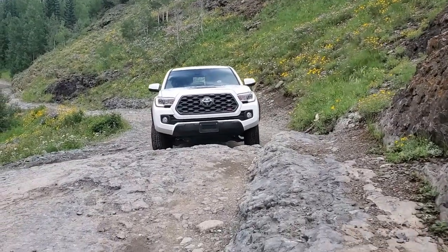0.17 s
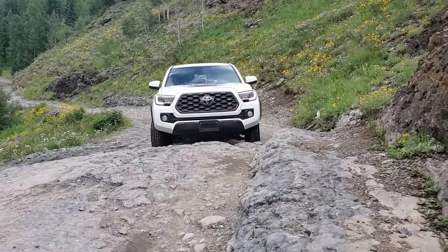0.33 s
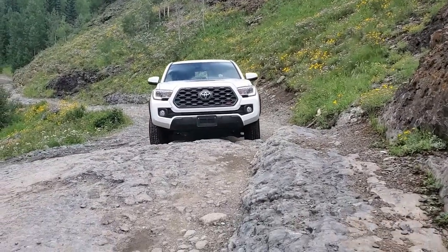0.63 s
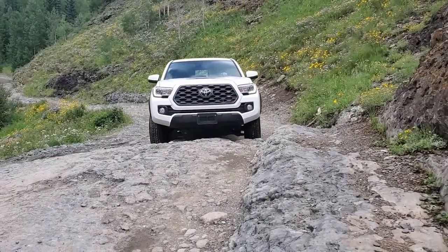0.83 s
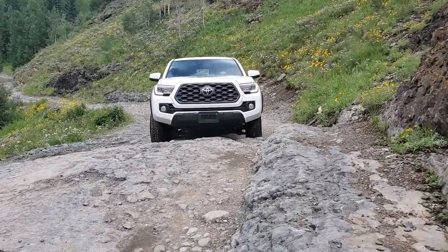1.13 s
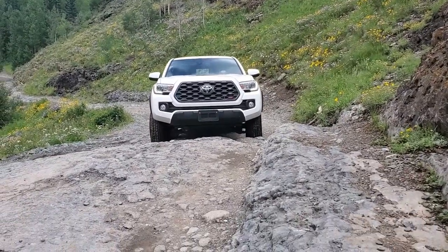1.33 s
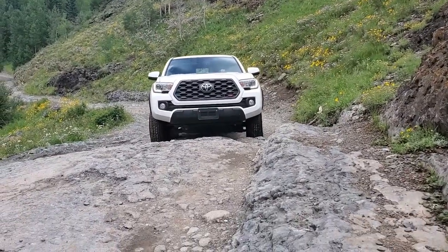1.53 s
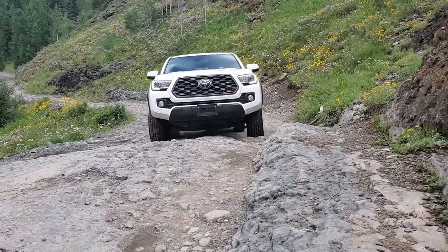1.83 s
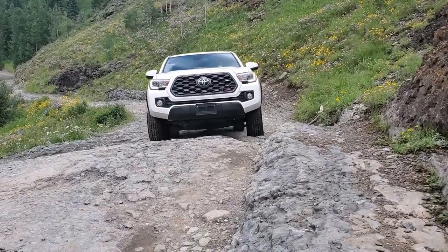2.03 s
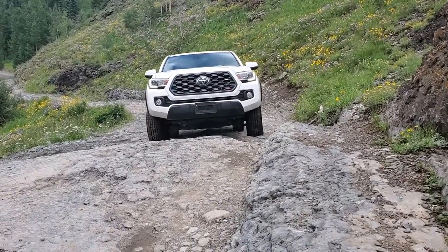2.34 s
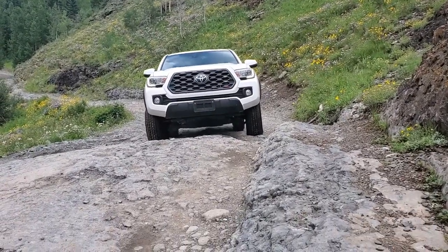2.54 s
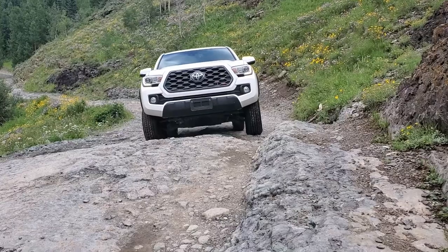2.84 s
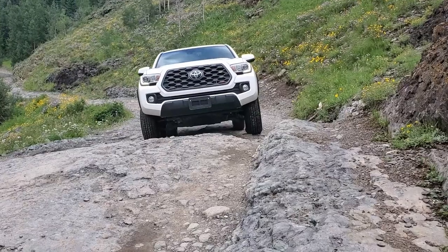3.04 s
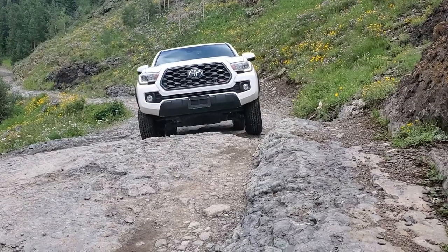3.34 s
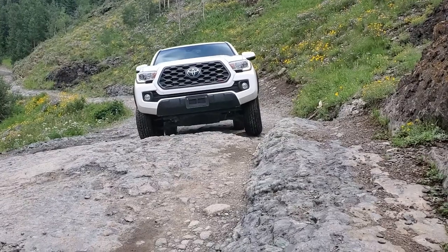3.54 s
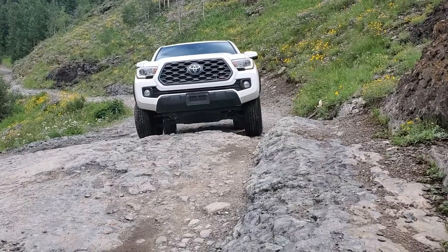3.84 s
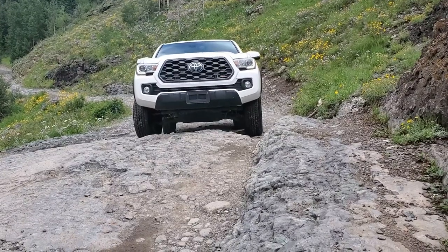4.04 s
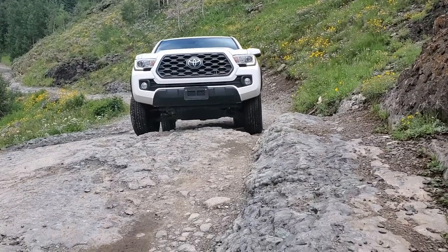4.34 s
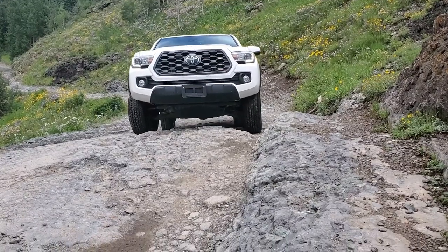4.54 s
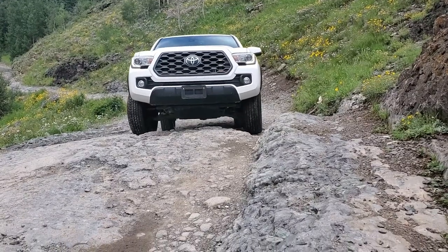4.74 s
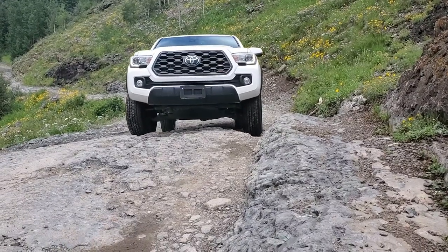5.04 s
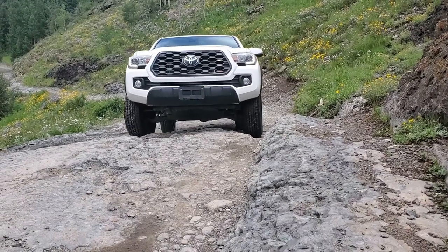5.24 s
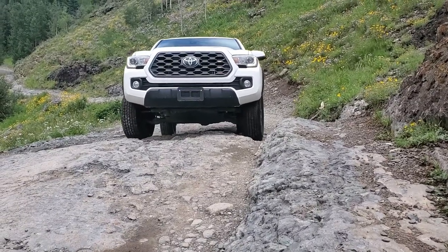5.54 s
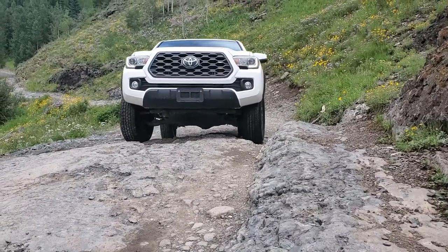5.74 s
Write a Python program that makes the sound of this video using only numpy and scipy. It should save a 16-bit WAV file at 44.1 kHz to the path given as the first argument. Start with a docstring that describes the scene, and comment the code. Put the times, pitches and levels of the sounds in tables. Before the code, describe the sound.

A six-cylinder pickup crawls over an open rock slab, approaching from about 13 to 10.5 metres. The engine starts moderately revved, drops by 0.75 s, then pushes up to a throaty swell around 1.5 s. It eases near 2 s and surges again to its highest, roughest pitch at 2.7 s, then falls into a low lull from about 3.3 s. From 4.2 s it climbs unevenly, ending in a fuller pull. Pulsing exhaust and block growl carry airy fan noise, intake hum, valve clatter and faint tyre hiss. Pebbles snap at 0.3 and 0.9 s; a gritty scuff with tiny chirps comes at 0.4 s, more scuffs around 1.4 s. A loose rock knocks loudly at 2.78 s amid bass thumps, with further thumps near 3.4, 4.8 and 5.2 s. Soft hollow rush and low rumble swell occasionally. Light wind buffets the stereo microphone; the truck sits slightly right, without echo.

```python
"""On an open rock slab, a six-cylinder pickup crawls up from 13 m to 10.5 m away, its throttle opening and easing.
Gliding crankshaft tones and pulsed noise make the exhaust; noise paced by the firings makes growl, fan, intake
and valve clatter. Shaped noise makes scuffs, grit, rumble and a hollow rush, short damped swings thump in the
bass, and struck modes make one loose rock knock. A light breeze of low noise buffets the two microphone ports."""
import sys
import numpy as np
from scipy.fft import rfft, irfft, next_fast_len
from scipy.io import wavfile
from scipy.ndimage import map_coordinates

SR = 44100
rng = np.random.default_rng(int(sys.argv[2]) if len(sys.argv) > 2 else 0)


def to_wav(s):
    """Save 16-bit WAV."""
    ch = np.atleast_2d(s).T  # columns
    pcm = np.round(np.clip(ch, -1, 1) * 32767)  # PCM
    wavfile.write(sys.argv[1], SR, pcm.astype(np.int16))


N = 259749

# engine speed, two pushes on the throttle, a lull, a longer pull: (time [s], firing rate [1/s])
FIRING_RATE = [(0, 110), (.2, 106), (.55, 82), (.76, 76), (.9, 86), (1, 99), (1.07, 110), (1.16, 120),
               (1.26, 123), (1.35, 131), (1.55, 140), (1.85, 119), (2.05, 112), (2.22, 118), (2.34, 134),
               (2.7, 149), (2.8, 144), (3, 113), (3.35, 87), (3.7, 93), (4, 92), (4.25, 101), (4.55, 97),
               (4.8, 99), (4.94, 106), (5.08, 106), (5.2, 112), (5.29, 119), (5.39, 112), (5.5, 122),
               (5.62, 124), (5.73, 117), (5.89, 120)]
# tone at the firing rate, throbbing under load and fading as the truck coasts: (time [s], level [dB])
FIRING_TONE = [(0, -45), (.12, -37), (.3, -48), (.62, -50), (.77, -38), (.92, -36), (1.04, -32), (1.2, -31),
               (1.3, -38), (1.42, -37), (1.55, -46), (1.83, -48), (1.96, -35), (2.04, -44), (2.12, -37),
               (2.27, -34), (2.6, -50), (4.1, -50), (4.23, -41), (4.6, -51), (4.8, -39), (4.93, -34.5),
               (5, -44), (5.08, -35), (5.19, -30.5), (5.24, -37), (5.31, -31), (5.42, -38), (5.59, -29.5),
               (5.72, -35), (5.89, -37)]
# deeper lope at twice the crankshaft speed: (time [s], level [dB])
LOPE_TONE = [(0, -45), (1, -50), (1.14, -36), (1.23, -44), (1.33, -33.5), (1.52, -32), (1.6, -40),
             (1.8, -41), (1.9, -48), (2.25, -48), (2.35, -31.5), (2.48, -32.5), (2.56, -39), (2.66, -32),
             (2.8, -42), (3.2, -50), (5.2, -45), (5.6, -38), (5.89, -38)]
# the weaker exhaust orders: (multiple of the crankshaft speed [1], relative level [dB])
WEAK_ORDERS = [(1, -10), (1.5, -7), (2.5, -7), (3.5, -8), (4, 0), (4.5, -8), (5, -4), (5.5, -2), (6, -7)]
# relative spectra of tailpipe, engine block, fan, fine grit and breeze: (frequency [Hz], density [dB per Hz])
PIPE_SPECTRUM = [(25, -41), (50, -17.5), (70, -16), (92, 5), (122, -1.5), (145, -6.5), (168, -5),
                 (200, -20.5), (260, -10), (330, -20), (450, -20.5), (900, -80)]
BLOCK_SPECTRUM = [(150, -10), (250, 4), (340, -6), (430, -2), (600, -1), (720, -4), (830, -23), (950, -13),
                  (1300, -16), (2500, -42.5)]
FAN_SPECTRUM = [(410, -40), (700, 0), (759, 1.5), (824, -3.5), (922, -1), (1210, -2.5), (1660, -2),
                (2210, -4.5), (2500, -5), (2770, -7), (3580, -12.5), (4810, -18.5), (6390, -21.5),
                (8000, -31.5), (10400, -60), (17600, -120)]
HISS_SPECTRUM = [(2500, 4.5), (4500, 1.5), (6300, 6.5), (7200, 3.5), (8000, -3.5), (8900, 5.5), (10000, 1),
                 (12500, -2), (13700, -0.5), (16000, -1)]
EDDY_SPECTRUM = [(10, -30), (25, -16), (36, -4.5), (48, 5.5), (68, 6.5), (90, 3.5), (130, -7.5),
                 (200, -11.5), (500, -67)]
# hum of the intake as the throttle opens and closes: (time [s], level [dB])
INTAKE_LEVEL = [(0, -52), (.45, -54), (.85, -55), (1.1, -47.5), (1.35, -48.5), (1.65, -45), (1.9, -46),
                (2.2, -52), (2.33, -47), (2.55, -45), (2.85, -47), (3.1, -56.5), (3.55, -60), (3.9, -52),
                (4.6, -57), (5.3, -50.5), (5.89, -49)]
# ring of the valve covers: (frequency [Hz], width [Hz])
COVER_RINGS = [(1660, 400), (2490, 240)]
# loudness of those rings before their flutter: (time [s], lower ring level [dB], upper ring level [dB])
COVER_LEVELS = [(0, -69, -68), (.7, -72, -62.5), (1.05, -59, -69), (1.25, -61, -55.5), (1.5, -55, -55),
                (1.9, -63, -66), (2.15, -57, -57), (2.3, -50.5, -55), (2.6, -57, -55), (3.1, -57, -74),
                (3.75, -74, -67), (4.1, -61, -75), (4.5, -68, -61.5), (5.1, -58.5, -63), (5.89, -55.5, -59)]
# the two microphone ports: (frequency [Hz], likeness [-1 to 1], left minus right [dB])
MIC_PORTS = [(130, 1, -1), (291, 1, -3), (420, 0.59, -0.5), (650, 0.86, 1), (810, 0.45, -5.5),
             (1000, 0.38, -0.5), (1430, -0.0062, -4), (1580, -0.056, -2.5), (2500, 0.5, -7),
             (3230, 0.12, -4), (4130, 0.29, -1), (5340, 0.14, -3.5), (7450, -0.026, -9),
             (7750, 0.046, -0.5), (10500, -0.054, -2.5), (14000, -0.082, -2.5)]
# gusts: (time of peak [s], level [dB], half length [s], left minus right [dB], likeness of the ports [1])
GUST_EVENTS = [(0.01, -31, 0.055, -3, 0.15), (0.44, -36, 0.02, -13, -0.059), (0.59, -37, 0.07, -11, 0.29),
               (0.724, -27, 0.024, -3, 0.094), (0.82, -31, 0.08, -18, -0.16),
               (1.052, -28.5, 0.028, -22, -0.55), (1.178, -26, 0.036, -17, -0.96),
               (1.68, -32, 0.071, -5, 0.31), (2.038, -31, 0.045, -19, 0.21),
               (2.673, -22.5, 0.034, -15, -0.13), (2.796, -21.5, 0.021, -14, -1.1),
               (3.014, -24.5, 0.11, -5, -0.15), (3.37, -27, 0.044, 21, -0.67),
               (3.806, -26.5, 0.059, -2, -0.52), (4.44, -30.5, 0.025, -22, .2),
               (4.576, -35.5, 0.092, 17, 0.13), (4.83, -31, 0.022, 1, .2), (5.018, -27, 0.014, -19, 0.2),
               (5.536, -29.5, 0.019, -14, -0.36)]
# slow swells of a hollow rush near 950 Hz: (time of middle [s], level [dB], half length [s])
RUSH_SWELLS = [(.28, -54, 0.35), (2.6, -52, 0.2), (5.55, -51, 0.2)]
# relative spectrum of that rush: (frequency [Hz], density [dB per Hz])
RUSH_SPECTRUM = [(400, -5.5), (800, -2.0), (950, 10.5), (1150, -5.0), (1400, -22), (3000, -28.0)]
# stones snapping under the tread: (time [s], peak level [dB], pitch [Hz])
STONE_SNAPS = [(.221, -50, 13500), (.28, -43, 14000), (.298, -36.5, 14500), (.876, -41, 11000),
               (.898, -49, 14000), (1.485, -47, 10000), (1.57, -48, 10000), (2.963, -47, 7500),
               (4.047, -48, 6000), (4.767, -41, 2500), (4.934, -44, 4500), (5.435, -46, 12000),
               (5.565, -47, 13000)]
# a loose rock knocking: (time [s], peak level [dB])
ROCK_KNOCKS = [(2.7804, -18.3), (2.7812, -24.5), (2.7816, -20.3)]
# modes of that rock: (frequency [Hz], width [Hz], relative level [dB])
ROCK_MODES = [(350, 300, 12), (750, 1000, 21), (1500, 1400, 10), (2750, 800, 6.5)]
# scuffs, and longer soft swells of gritty hiss: (time of middle [s], grit level [dB], half length [s],
# grit pitch [Hz], top of the grit [Hz], squeak pitch [Hz], squeak level [dB])
SCUFF_EVENTS = [(0.403, -54.5, 0.018, 5600, 16000, 2880, -49.5), (.44, -61, .018, 5000, 12000, 2800, -54),
                (1.353, -50, 0.012, 3700, 4500, 800, -52), (1.368, -48.5, .012, 1900, 4500, 1800, -53),
                (1.478, -57, .018, 4500, 12000, 1560, -47.5), (1.54, -55, .016, 3600, 12000, 2850, -51),
                (1.61, -58, .02, 4000, 9000, 1560, -51), (2.52, -55.5, .13, 4200, 7500, 2100, -53),
                (2.699, -49, 0.0089, 4200, 16000, 980, -52), (3.05, -52.5, .07, 2004, 6000, 2400, -56),
                (3.672, -49, 0.011, 2500, 5000, 1939, -54), (5.75, -55, .2, 4200, 5000, 1050, -56)]
# a tyre chirping on the slab: (time of middle [s], peak level [dB], pitch [Hz], half length [s])
SLIP_CHIRPS = [(.3955, -36, 2750, .0013), (.4002, -40, 2980, .0015), (.4162, -41, 2800, .002),
               (.4335, -46, 2820, .002), (2.699, -37, 975, .0065)]
# swells of low rumble, about 120-300 Hz: (time of middle [s], level [dB], half length [s])
RUMBLE_SWELLS = [(1.56, -40, 0.045), (1.751, -36.5, .03), (1.962, -36.5, 0.028), (2.46, -38, 0.073),
                 (2.65, -40, 0.059), (2.988, -41, 0.029), (3.91, -38, .09), (4.544, -38.5, 0.034),
                 (5.313, -39, 0.036)]
# relative spectrum of that rumble: (frequency [Hz], density [dB per Hz])
RUMBLE_SPECTRUM = [(60, -35), (120, -3), (165, 3), (205, -14), (250, -7.5), (295, -12), (350, -25.5),
                   (600, -77)]
# low thumps and throbs of the bass, each a short damped swing:
# (time [s], envelope peak [dB], pitch [Hz], upper ring relative to the swing [dB])
BASS_THUMPS = [(2.338, -26, 95.5, -18), (2.406, -26, 101, -18), (2.639, -23.5, 111, -16),
               (2.764, -24, 115, -2), (2.799, -25, 67.6, -13), (3.341, -26, 65, -22), (3.376, -23, 103, -9),
               (3.428, -30, 95, -20), (4.835, -25, 72, -18), (5.181, -28, 104, -19), (5.285, -25, 117, -18)]

START_M, END_M = 13.18, 10.54  # distance of the truck from the microphone
CRAWL_RATE = 110  # firings a second at which the five levels below hold, at the starting distance
FULL_RATE = 148  # firings a second beyond which drive stops rising
# level [dB], and its rise [dB per doubling of the revs or drive]
EXHAUST_DB, EXHAUST_RISE_DB = -41.5, 10
PUFF_DB, PUFF_RISE_DB = -40, 15
BAY_DB, BAY_RISE_DB = -49.5, 5
FAN_DB, FAN_RISE_DB = -48.5, 5
HISS_DB, HISS_RISE_DB = -67.5, 12
PULL_S = 0.058  # pull is how many octaves the revs have risen over this time
EXHAUST_PULL_DB, FAN_PULL_DB, HISS_PULL_DB = 8.5, 4.5, 32  # extra dB per octave of pull
BAY_LAG_S = 0.025  # the growl trails the revs
LUMP_DB, LUMP_RATE = 1.5, 24  # swing of the exhaust puffs, knots a second
AIRBOX_HZ, AIRBOX_WIDTH_HZ = (598, 565), 104  # resonance at the lowest and highest revs
COVER_FLUTTER_DB, COVER_FLUTTER_RATE = 1.5, 25  # swing of each cover ring, knots a second
BREEZE_DB, BREEZE_LEAN_DB = -38, -2  # air between gusts before its flutter: level, left minus right
FLUTTER_DB, FLUTTER_RATE = 2, 15  # swing of the breeze on each port, knots a second
ROCK_DAMPED_HZ = 3050
THUMP_RING_HZ = 235
TOP_HZ = 15800  # the microphone's band limit


def amp(db):
    """Decibels to gain."""
    return 10 ** (np.asarray(db) / 20)


def unit(x):
    """Scale to rms 1."""
    return x / np.sqrt(np.mean(x ** 2) + 1e-20)


def along(points, hz):
    """Read (frequency, value) points on a log frequency axis."""
    f, v = np.transpose(points)
    return np.interp(np.log(hz + 1), np.log(f + 1), v)


def curves(rows):
    """One value per sample for each column after the time."""
    s, *cols = np.transpose(rows)
    return [np.interp(np.arange(N) / SR, s, c) for c in cols]


def wobble(rate):
    """A smooth random curve, rate knots a second."""
    knots = rng.standard_normal(int(N * rate / SR) + 4)
    return map_coordinates(knots, [np.arange(N) * rate / SR])


def swell(s, length):
    """A bell-shaped rise and fall around time s; length is its standard deviation."""
    return np.exp(-.5 * ((np.arange(N) / SR - s) / length) ** 2)


def filtered(x, response):
    """Multiply the spectrum of x by a response of frequency, padded against wrap-around."""
    m = next_fast_len(N + SR // 2)
    return irfft(rfft(x, m) * response(np.fft.rfftfreq(m, 1 / SR)), m)[..., :N]


def resonance(f, centre, width):
    """Causal response of one mode."""
    return 1j * f * width / (centre ** 2 - f ** 2 + 1j * f * width)


def blow(s, db, response):
    """One impulse at time s through a body's response, peaking at db."""
    impulse = 1. * (np.arange(N) == round(s * SR))
    click = filtered(impulse, response)
    return amp(db) * click / np.abs(click).max()


def white():
    """Two unrelated noises."""
    return rng.standard_normal((2, N))


def spread(pair, spectrum):
    """Colour two unrelated signals and blend them into a left and right of mid rms 1."""
    likeness = [(hz, alike) for hz, alike, lean in MIC_PORTS]

    def mid_side(f):
        turn = np.arccos(np.clip(along(likeness, f), -1, 1)) / 2
        return amp(along(spectrum, f)) * [np.cos(turn), np.sin(turn)]

    mid, side = filtered(pair, mid_side)
    return np.array([mid + side, mid - side]) / np.std(mid)


def grit(rate, size_db):
    """Tiny cracks at random moments, rate a second, of unequal size."""
    size = amp(abs(size_db) * np.minimum(rng.exponential(size=N), 4))
    cracks = (rng.random(N) < rate / SR) * size
    return unit(cracks * white())


def strokes(phase, sharp, uneven_db, count=6):
    """One pulse per firing, each cylinder with its own strength."""
    cylinder_db = uneven_db * unit(rng.standard_normal(count))
    strength = amp(cylinder_db[phase.astype(int) % count])
    return unit(strength * np.exp(-sharp * np.cos(2 * np.pi * phase)))


def order_tone(phase, k):
    """A sine at k times the crankshaft speed (three firings a turn), its phase wandering slightly."""
    return np.sin(2 * np.pi * (k * phase / 3 + rng.random()) + 0.12 * wobble(12))


def exhaust(firing, phase):
    """The weaker crankshaft orders glide through the pipe's resonance and beat against each other."""
    orders = 0
    for k, db in WEAK_ORDERS:
        level_db = db + along(PIPE_SPECTRUM, k * firing / 3) + 1.5 * wobble(7)
        orders = orders + amp(level_db) * order_tone(phase, k)
    return unit(orders)


def exhaust_note(phase):
    """The two strong orders are clean tones that swell and fade with the load."""
    firing_tone = amp(curves(FIRING_TONE)[0]) * unit(order_tone(phase, 3))
    lope = amp(curves(LOPE_TONE)[0]) * unit(order_tone(phase, 2))
    return firing_tone + lope


def puffs(phase):
    """Each firing leaves the tailpipe with a turbulent puff; the puffs come in uneven lumps."""
    lumps = unit(amp(LUMP_DB * wobble(LUMP_RATE)))
    return spread(white() * lumps * strokes(phase, sharp=0.58, uneven_db=-0.5), PIPE_SPECTRUM)


def engine_bay(phase):
    """Combustion growls through the block as noise pulsing with the firings."""
    return spread(white() * strokes(phase, sharp=0.71, uneven_db=2.5), BLOCK_SPECTRUM)


def fan(phase):
    """Air rushes through the grille, with valves ticking in step with the cylinders."""
    valves = white() * strokes(phase, sharp=0.9, uneven_db=3)
    return amp(0.74 * wobble(12)) * spread(white() + amp(-10.0) * valves, FAN_SPECTRUM)


def intake(phase, revs):
    """Cylinders gulp turbulent air; the air box hums, its resonance slightly lower as the revs rise."""
    gulps = strokes(phase, sharp=14, uneven_db=6) * (1 + 0.6 * rng.standard_normal(N))
    air = rng.standard_normal(N) * strokes(phase, sharp=0.27, uneven_db=2)

    def box(x, hz):
        return unit(filtered(x, lambda f: resonance(f, hz, AIRBOX_WIDTH_HZ) ** 2))

    low_rev_hum, high_rev_hum = [box(air, hz) + amp(-3) * box(gulps, hz) for hz in AIRBOX_HZ]
    high = (revs - revs.min()) / np.ptp(revs)
    return amp(curves(INTAKE_LEVEL)[0]) * unit((1 - high) * low_rev_hum + high * high_rev_hum)


def covers(phase):
    """The valves rattle their covers, which ring in two modes."""
    valves = white() * strokes(phase, sharp=0.9, uneven_db=2.5)
    out = 0
    for (hz, width), level_db in zip(COVER_RINGS, curves(COVER_LEVELS)):
        ring = filtered(valves, lambda f: resonance(f, hz, width) ** 2)
        flutter_db = COVER_FLUTTER_DB * wobble(COVER_FLUTTER_RATE)
        out = out + amp(level_db + flutter_db) * spread(ring, FAN_SPECTRUM)
    return out


def tyre_hiss():
    """Fine grit hisses under the tyres as steady noise with a few sparse cracks."""
    return spread(white() + amp(-32) * grit(rate=100, size_db=8), HISS_SPECTRUM)


def truck():
    """Five parts grow with revs, pull or nearness; the note, intake and covers follow their own level curves."""
    t, speed = np.arange(N) / SR, curves(FIRING_RATE)[0]
    firing = speed * (1 + 0.004 * wobble(10))
    phase = np.cumsum(firing) / SR  # counted in firings
    revs = np.log2(speed / CRAWL_RATE)  # octaves
    drive = np.minimum(revs, np.log2(FULL_RATE / CRAWL_RATE))
    pull = revs - np.interp(t - PULL_S, t, revs)
    late_revs = np.interp(t - BAY_LAG_S, t, revs)

    exhaust_db = EXHAUST_DB + EXHAUST_RISE_DB * drive + EXHAUST_PULL_DB * pull
    fan_db = FAN_DB + FAN_RISE_DB * revs + FAN_PULL_DB * pull
    hiss_db = HISS_DB + HISS_RISE_DB * drive + HISS_PULL_DB * pull + 1.5 * wobble(21.77)
    parts = (amp(exhaust_db) * exhaust(firing, phase)
             + amp(PUFF_DB + PUFF_RISE_DB * drive) * puffs(phase)
             + amp(BAY_DB + BAY_RISE_DB * late_revs) * engine_bay(phase)
             + amp(fan_db) * fan(phase)
             + amp(hiss_db) * tyre_hiss())
    nearness = START_M / np.linspace(START_M, END_M, N)
    return parts * nearness + exhaust_note(phase) + intake(phase, revs) + covers(phase)


def breeze():
    """Eddies rumble on the ports: a flutter, and gusts that favour one port or push one while pulling the other."""
    a, b = unit(filtered(white(), lambda f: amp(along(EDDY_SPECTRUM, f))))

    def ports(lean_db):
        return unit(amp([[lean_db / 2], [-lean_db / 2]]))

    flutter_db = FLUTTER_DB * np.array([wobble(FLUTTER_RATE), wobble(FLUTTER_RATE)])
    flutter = amp(BREEZE_DB + flutter_db) * ports(BREEZE_LEAN_DB)
    power, shared = flutter ** 2, 0
    for s, db, length, lean_db, alike in GUST_EVENTS:
        gust = (amp(db) * swell(s, length)) ** 2
        power = power + gust * ports(lean_db) ** 2
        shared = shared + alike * gust
    # the share of common power sets how alike the two ports move
    turn = np.arccos(np.clip(shared / power.mean(0), -1, 1)) / 2
    mid, side = a * np.cos(turn), b * np.sin(turn)
    return np.sqrt(power) * np.array([mid + side, mid - side])


def hollow_rush():
    """Noise with a broad peak near 950 Hz swells slowly and flutters."""
    swells = sum(amp(db) * swell(s, length) for s, db, length in RUSH_SWELLS)
    return swells * amp(1.3 * wobble(16)) * spread(white(), RUSH_SPECTRUM)


def stones(decay=0.0005):
    """Pebbles give dry snaps of decaying noise; a loose rock's modes are struck in a tight burst."""
    t, snaps = np.arange(N) / SR, np.zeros((2, N))
    for s, db, hz in STONE_SNAPS:
        burst = white() * (t >= s) * np.exp(-abs(t - s) / decay)
        snap = filtered(burst, lambda f: resonance(f, hz, 5800) ** 2)
        snaps += amp(db) * snap / np.abs(snap).max()

    def rock(f):
        modes = sum(amp(db) * resonance(f, hz, width) for hz, width, db in ROCK_MODES)
        return modes / (1 + (f / ROCK_DAMPED_HZ) ** 18)  # the tyre on top of the rock damps its treble

    return snaps + sum(blow(s, db, rock) for s, db in ROCK_KNOCKS)


def scuffs():
    """Swarms of tiny cracks rasp beside a narrow noisy squeak, in short scuffs and longer soft swells of hiss."""
    out = np.zeros((2, N))
    for s, db, length, hz, top_hz, squeak_hz, squeak_db in SCUFF_EVENTS:
        rasp = filtered(grit(rate=4000, size_db=1),
                        lambda f: resonance(f, hz, hz) ** 2 / (1 + (f / top_hz) ** 6))
        squeak = filtered(rng.standard_normal(N), lambda f: resonance(f, squeak_hz, 0.23 * squeak_hz) ** 2)
        out += swell(s, length) * (amp(db) * unit(rasp) + amp(squeak_db) * unit(squeak))
    return out


def slips():
    """Rubber sticks and lets go in quick chirps, each a short sine."""
    t, out = np.arange(N) / SR, np.zeros(N)
    for s, db, hz, length in SLIP_CHIRPS:
        out += amp(db) * swell(s, length) * np.sin(2 * np.pi * hz * (t - s))
    return out


def low_rumble():
    """Low noise, strongest between about 120 and 300 Hz, rises and falls in short swells."""
    swells = sum(amp(db) * swell(s, length) for s, db, length in RUMBLE_SWELLS)
    return swells * spread(white(), RUMBLE_SPECTRUM)


def thumps(rise=0.0063):
    """Each thump or throb of the bass is a short damped swing with a fainter ring above it."""
    t, out = np.arange(N) / SR, np.zeros(N)
    for s, db, hz, ring_db in BASS_THUMPS:
        age = np.maximum(t - s, 0)
        swing = np.sin(2 * np.pi * hz * age)
        ring = amp(ring_db) * np.sin(2 * np.pi * THUMP_RING_HZ * age)
        envelope = age / rise * np.exp(1 - age / rise)
        out += amp(db) * envelope * (swing + ring)
    return out


def scene():
    """The truck in open air, mostly stronger on the right, the side of the rock face; breeze on the ports."""
    vehicle = truck() + hollow_rush() + scuffs() + slips() + stones() + thumps() + low_rumble()
    balance = [(hz, lean) for hz, alike, lean in MIC_PORTS]
    placed = filtered(vehicle, lambda f: amp(along(balance, f) * np.array([[.5], [-.5]])))
    return placed + breeze()


def record(dry):
    """The microphone passes nothing above its band limit."""
    return filtered(dry, lambda f: f < TOP_HZ)


dry = scene()
out = record(dry)
to_wav(out)
```